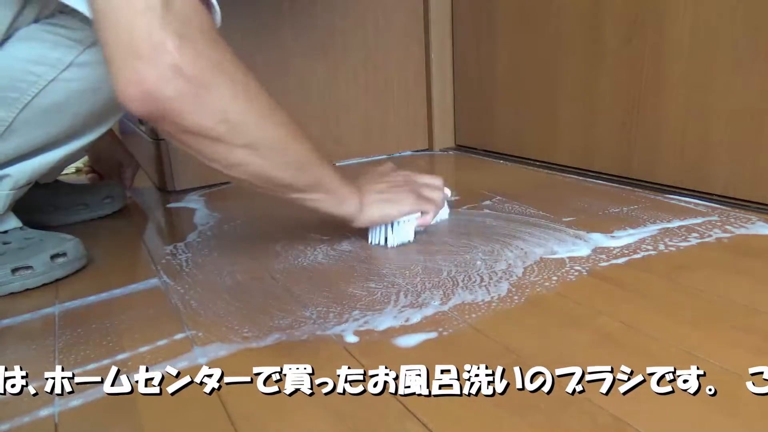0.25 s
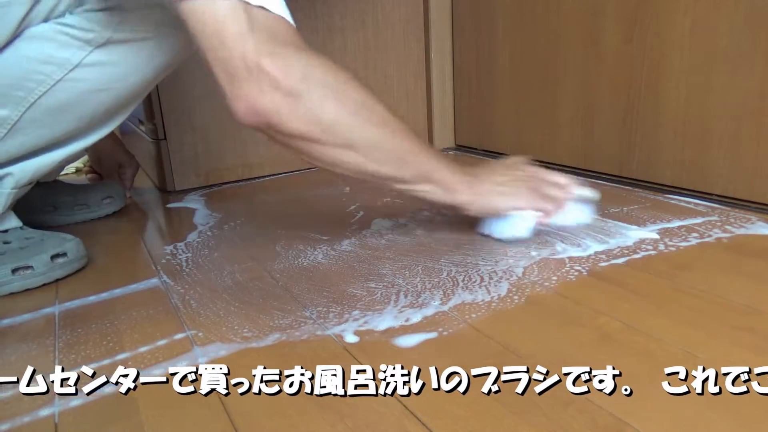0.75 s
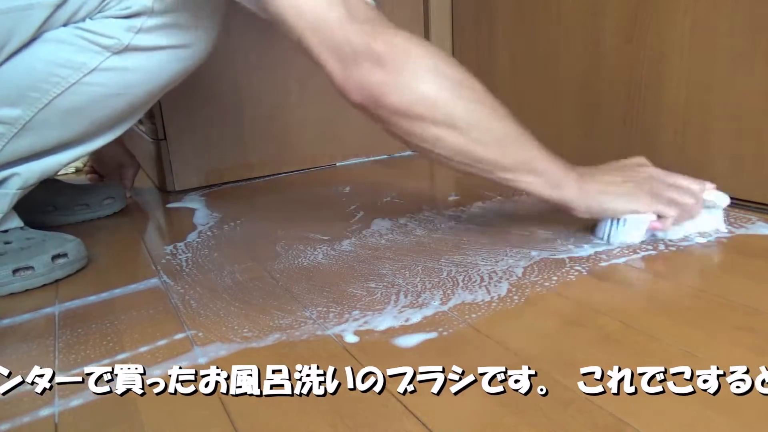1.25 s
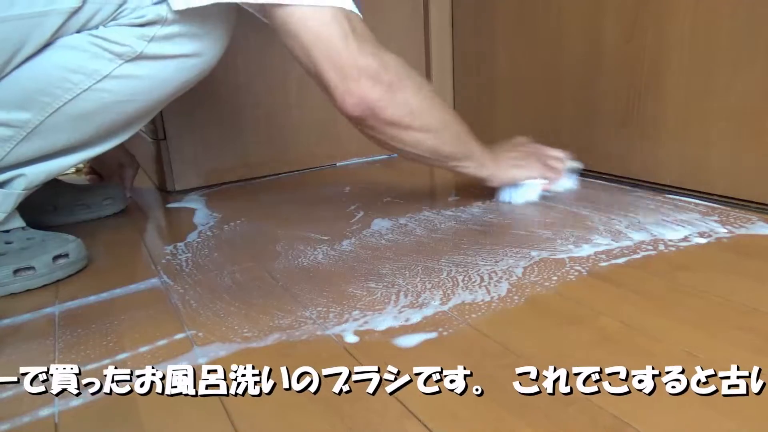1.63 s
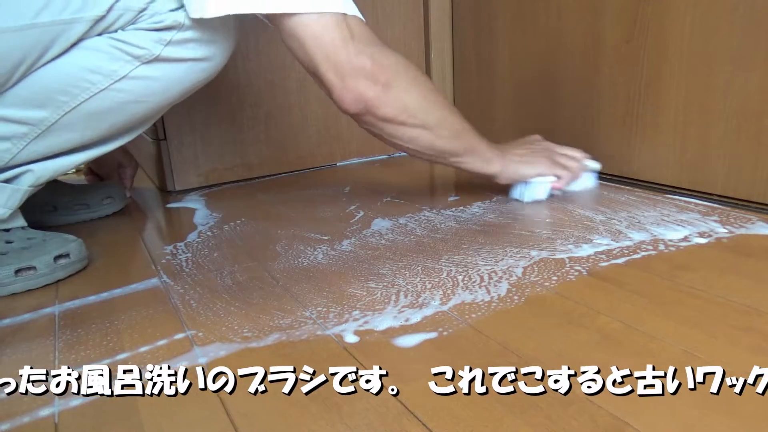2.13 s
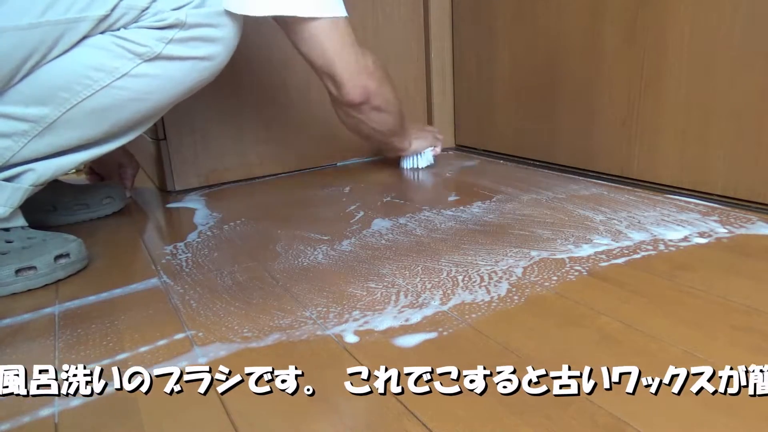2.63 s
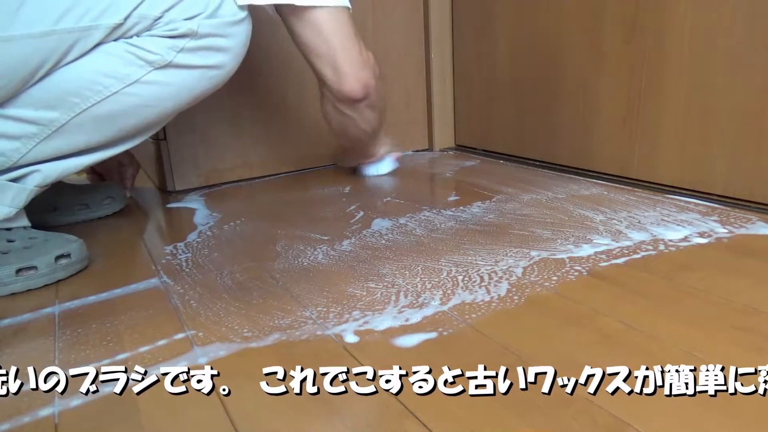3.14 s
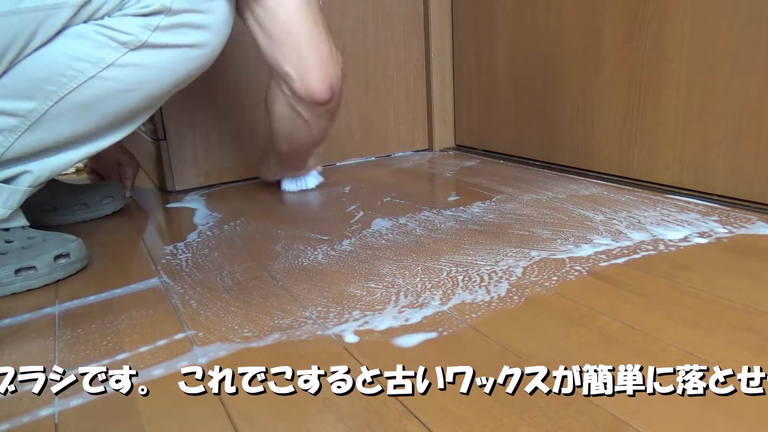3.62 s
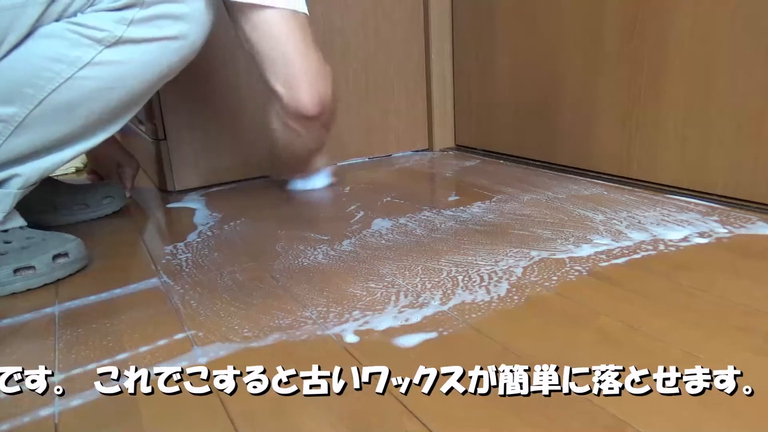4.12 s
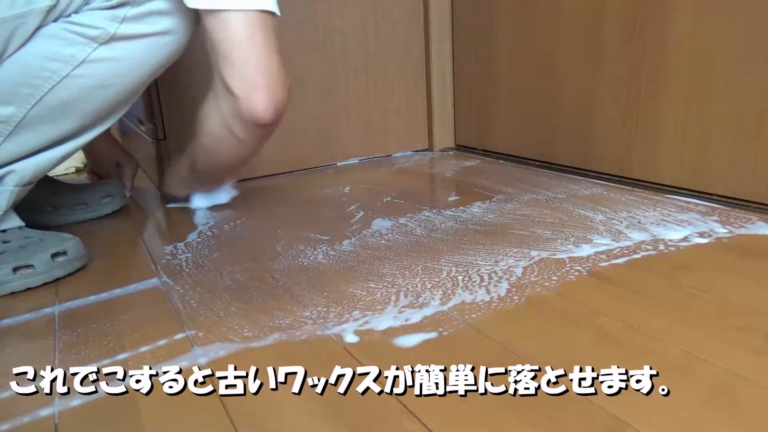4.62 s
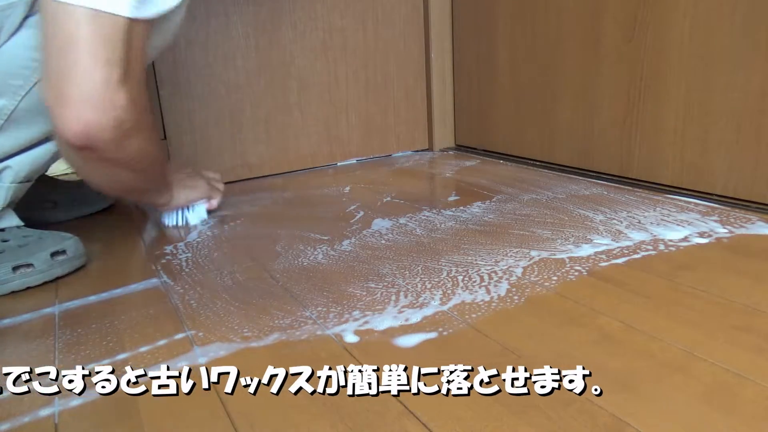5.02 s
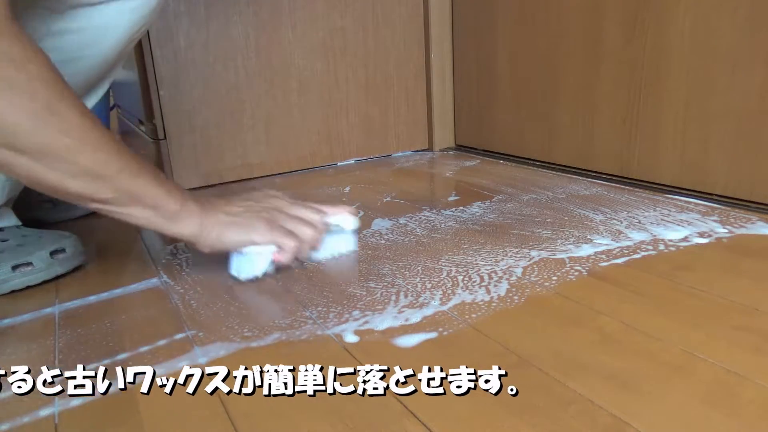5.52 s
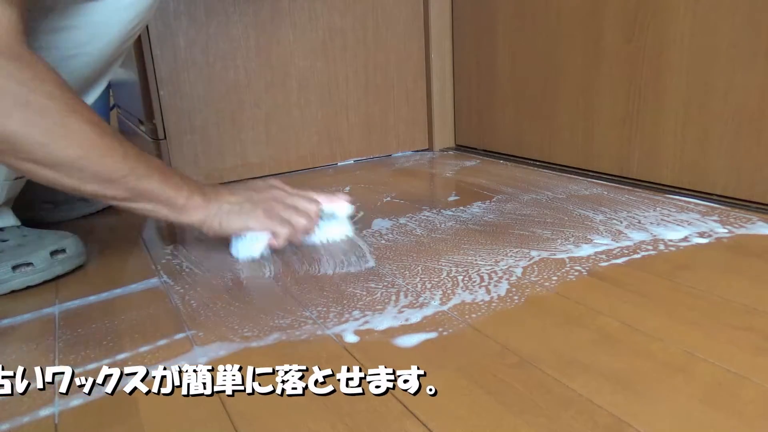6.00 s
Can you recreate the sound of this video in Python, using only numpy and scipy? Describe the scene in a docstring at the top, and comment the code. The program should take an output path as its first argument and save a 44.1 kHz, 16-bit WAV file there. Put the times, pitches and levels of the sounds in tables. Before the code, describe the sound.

From the start a stiff bristle brush scrubs quickly over a soapy wooden floor, around seven strokes a second, each a scratchy swish that swells and dips with the hand. Foam sizzles brightly above, tufts stutter at many turns, and a soft low rumble comes in uneven lumps below. A light tap lands near 1.2 s. From about 2 s the strokes slow to five or six a second and become less even, with weak knocks at 1.9, 2.1 and 2.6. Loud hollow door thumps with hard plastic cracks follow near 2.9, 3.1, a cluster at 3.3-3.5, then 3.9, 4.3 and 4.6, with brief woody rubs along the door from 3 to 4.4. The foam thins around 3 s. After a faint tap at 5.3, strong, steady scrubbing continues to the end at about 6.3 s. Close, almost centred, in a quiet hallway with short reflections.

```python
"""A stiff bristle brush scrubs to and fro over a soapy wooden floor in a hallway, about seven strokes a second
at first and slower later. Bristle flicks and sizzling foam follow the speed of the hand, the tufts judder by
stick-slip, mostly soon after each turn, and a low floor rumble comes in lumps. From the second second on the
brush knocks a wooden door, ringing its modes, and midway rubs along its foot. The microphone is close; echoes
from the corner and a short diffuse tail surround the sound."""
import sys
import numpy as np
from scipy import signal
from scipy.fft import rfft, irfft, next_fast_len
from scipy.io import wavfile

SR = 44100
rng = np.random.default_rng(int(sys.argv[2]) if len(sys.argv) > 2 else 0)


def dump(signal):
    """Clip the signal to [-1, 1] and save it as 16-bit WAV at the path in sys.argv[1]."""
    limited = np.clip(np.atleast_2d(signal).T, -1, 1)
    pcm = np.round(limited * 32767).astype(np.int16)
    wavfile.write(sys.argv[1], SR, pcm)


N = 276066
TIME = np.arange(N) / SR


def from_db(db):
    """Decibels to amplitude gain: 20 dB is a factor of ten."""
    return 10 ** (np.asarray(db) / 20)


def rms_one(x):
    """Normalise the mean power, so that the rms is one."""
    return x / np.sqrt(np.mean(x ** 2) + 1e-20)


def over_time(rows):
    """Linear interpolation of (time_s, level_db) rows."""
    return np.interp(TIME, *np.transpose(rows))


def colour(x, spectrum):
    """Zero-phase filtering by a (frequency_hz, level_db) spectrum, interpolated over log frequency."""
    hz, db = np.transpose(spectrum)
    size = next_fast_len(N)
    bins_hz = np.maximum(np.arange(size // 2 + 1) * SR / size, 1)
    gain = from_db(np.interp(np.log(bins_hz), np.log(hz), db))
    return irfft(rfft(x, size) * gain, size)[:N]


def drift(rate):
    """Slow random modulation of rms one: Gaussian points, `rate` a second, joined by straight lines."""
    knots = rng.standard_normal(8000)
    return rms_one(np.interp(TIME * rate, np.arange(len(knots)), knots))


def flicks(per_s, spread_db):
    """Random impulse noise of uneven size and sign; the mean power is one whatever the rate."""
    chance = per_s / SR
    sizes = from_db(spread_db * np.minimum(rng.exponential(1, N), 4))
    signs = rng.choice([-1, 1], N)
    return rms_one((rng.random(N) < chance) * sizes * signs / np.sqrt(chance))


def slips(per_s, jitter, burst_s):
    """Irregular stick-slip: each release of a tuft is a burst of noise that decays exponentially."""
    rate = per_s * np.exp(jitter * drift(150))
    releases = np.diff(np.floor(np.cumsum(rate) / SR), prepend=0)
    releases = releases * from_db(rng.uniform(-0.5, 1.8, N))
    bursts = signal.lfilter([1], [1, -np.exp(-1 / (burst_s * SR))], releases + 1e-18)
    return bursts * rng.standard_normal(N)


def swells(rows, scale_s, rise=0.75, fall=1.07):
    """Power sum of Gaussian envelopes, one per (centre_s, level_db) row, building faster than they fade."""
    power = 0
    for s, db in rows:
        width = scale_s * np.where(TIME < s, rise, fall)
        power = power + from_db(2 * db) * np.exp(-((TIME - s) / width) ** 2)
    return np.sqrt(power)


def dying(t, t60):
    """Exponential decay of a free vibration, down 60 dB after t60 seconds."""
    return np.exp(-np.log(1000) * t / t60)


# quiet air of the hallway, relative spectrum: frequency_hz [Hz], level_db [dB]
AIR_SPECTRUM = [(20, -13), (60, -20), (150, -3), (500, 15), (3000, -21), (15000, -36)]


def room_air():
    """Diffuse background noise: independent middle and side signals give unlike left and right."""
    middle, side = (rms_one(colour(rng.standard_normal(N), AIR_SPECTRUM)) for _ in range(2))
    return from_db(-60) * (middle + 1.2 * side * np.array([[1], [-1]]))


# strokes, push and pull in turn: start_s [s], full_speed_level_db [dB],
# full_speed_place [share of the stroke, 0-1], flip_judder_db [dB]
STROKES = [(-.08, -23, 0.44, -41), (0.083, -22, 0.56, -21.5), (.218, -23, 0.42, -21.5),
           (.357, -23.5, .55, -21), (.501, -25, 0.41, -26), (0.649, -24.5, 0.52, -22),
           (0.791, -25.5, 0.43, -27), (0.934, -23.5, 0.52, -20), (1.071, -23, .51, -29),
           (1.214, -23, 0.47, -24), (1.344, -24, .53, -42), (1.487, -25.5, 0.49, -24),
           (1.609, -23.5, 0.49, -38), (1.781, -25, 0.43, -44), (1.928, -24, 0.44, -28.5),
           (2.13, -28, 0.51, -31), (2.29, -23, 0.69, -49), (2.492, -30, 0.2, -24.5),
           (2.583, -26.5, 0.42, -32), (2.708, -31, 0.28, -27), (2.845, -28, 0.43, -21.5),
           (2.985, -28.5, .45, -29), (3.09, -23.5, 0.54, -40), (3.327, -25, 0.34, -22),
           (3.521, -23, 0.35, -22.5), (3.704, -25, .66, -20), (3.884, -24, 0.55, -26),
           (4.115, -26, 0.53, -19), (4.261, -27, 0.52, -40), (4.463, -28, 0.51, -30),
           (4.594, -29.5, 0.6, -19), (4.752, -28.5, 0.62, -47), (4.953, -25.5, .6, -24.5),
           (5.095, -24, 0.6, -39), (5.297, -23.5, 0.62, -21.5), (5.468, -24, 0.64, -24),
           (5.649, -22.5, 0.73, -28), (5.833, -23, 0.69, -29), (6.015, -22, 0.63, -20.5),
           (6.183, -22, 0.67, -37)]
LAST_TURN_S = 6.34


def hand():
    """Reciprocating motion, at rest at each turn: speed 0-1, force in dB, direction (1 push, -1 pull)."""
    start, force_db, place, _ = np.transpose(STROKES)
    length = np.diff(start, append=LAST_TURN_S)
    k = np.maximum(np.searchsorted(start, TIME) - 1, 0)
    phase = np.clip((TIME - start[k]) / length[k], 0, 1)
    speeding_up = phase / place[k]
    slowing_down = (1 - phase) / (1 - place[k])
    speed = np.sin(np.pi / 2 * np.minimum(speeding_up, slowing_down))
    fastest_s = start + place * length
    push = np.interp(TIME, fastest_s, (-1) ** np.arange(len(start)))   # glides between full speeds
    return speed, force_db[k], push


# bristles still creeping while the hand turns; quick strokes hardly stop: time_s [s], level_db [dB]
CREEP = [(0, -34), (.5, -31.5), (1.3, -39.5), (1.8, -46.5), (2.55, -45), (2.7, -34), (2.85, -43),
         (4.5, -41.5), (5.1, -32.5), (5.3, -37.5), (5.9, -30), (6.26, -33)]


def friction_db(speed, force_db, law=1.074, law_per_db=-0.1):
    """Power-law friction in speed, sooner to bite in a harder stroke; at the turns only creep is left."""
    sliding = speed ** (law + law_per_db * (force_db - force_db.mean()))
    creep = from_db(over_time(CREEP))
    return 20 * np.log10(sliding * from_db(force_db) + (1 - sliding) * creep)


# relative spectra of bristle tips on the grain, bursting foam, fine fizz of fresh foam and
# droning boards: frequency_hz [Hz], level_db [dB per Hz]
SCRATCH_SPECTRUM = [(300, -64), (600, -36), (1100, -5), (1900, 1.5), (2600, 1.5), (3400, 1), (4800, 0),
                    (6200, -5), (8000, -4), (10500, -24), (15000, -51)]
SIZZLE_SPECTRUM = [(3000, -37), (5500, -6), (6600, -5), (7400, -1.5), (8500, 1.5), (9100, -3),
                   (9800, -10.5), (10800, -14.5), (12600, -15), (15500, -54)]
FIZZ_SPECTRUM = [(7000, -39), (9500, -1), (10700, -3), (12400, 1.5), (13800, 0), (14700, -16), (15500, -15)]
BOARD_SPECTRUM = [(250, -63), (480, -11), (700, -4.5), (860, -1), (1150, 2), (1500, 0), (2100, -3.5),
                  (3500, -31)]
# lather under the brush, thin along the door, as changes of the foam level: time_s [s], change_db [dB]
LATHER = [(0, 1), (.8, 4.5), (1.15, 3.5), (2.25, 5), (2.55, -3.5), (3.05, -6.5), (3.4, 1), (3.85, 3.5),
          (4.2, 0.5), (4.65, 0.5), (4.9, -2.5), (6.26, 0)]
# fizz against the lather, weak where the floor is only damp: time_s [s], change_db [dB]
FRESH_FOAM = [(0, -4.5), (.7, -6.5), (1.6, -12.5), (2.4, -6), (2.95, -23), (3.2, -9), (3.9, -12),
              (4.2, -6.5), (5.1, -8.5), (5.7, -4), (6.26, -4.5)]


def brush(speed, force_db, push):
    """Impact noise of bristles and bubbles, denser with speed; slow strokes are duller and drive the boards."""
    level_db = friction_db(speed, force_db) + 0.79 * drift(130)   # tufts let go in clumps
    slowness = 1 - speed
    # a push digs the bristles into the boards, a pull lets them glide on the foam
    foam_db = over_time(LATHER) - 0.3 * push - 5 * slowness
    fizz_db = foam_db + over_time(FRESH_FOAM) - 0.8 * push - 3 * slowness + 0.65 * drift(35)
    board_db = -4.0 - 3 + 3 * push + 9.5 * slowness

    scratch = rms_one(colour(flicks(2500 + 9000 * speed, spread_db=1.5), SCRATCH_SPECTRUM))
    foam = rms_one(colour(flicks(4000 + 14000 * speed, spread_db=1.5), SIZZLE_SPECTRUM))
    fizz = rms_one(colour(flicks(3000 + 12000 * speed, spread_db=-2.5), FIZZ_SPECTRUM))
    boards = rms_one(colour(flicks(1500 + 3000 * speed, spread_db=-0.5), BOARD_SPECTRUM))

    mix = scratch * from_db(2.13 + 0.5 * drift(60))
    mix = mix + foam * from_db(0.35 + foam_db)
    mix = mix + fizz * from_db(-1.5 + fizz_db)
    mix = mix + boards * from_db(board_db)
    return from_db(level_db) * mix


# relative spectrum of boards and brush body shaken by the tufts: frequency_hz [Hz], level_db [dB per Hz]
JUDDER_SPECTRUM = [(300, -22), (550, -7.5), (800, -0.5), (950, 2.5), (1160, 5.5), (1400, 1), (1800, -2),
                   (2600, -4), (5000, -43)]
# tufts snag and judder on the boards: centre_s [s], level_db [dB]
SNAGS = [(.015, -20.5), (.09, -20), (0.324, -17.5), (.61, -26), (0.904, -21), (1.447, -22.5), (2.037, -29),
         (2.66, -25), (2.76, -25), (3.667, -19.5), (4.06, -25), (5.03, -29)]


def judder():
    """Stick-slip vibration: tufts slip in quick volleys as they flip after each turn, or when they snag."""
    start, _, _, flip_db = np.transpose(STROKES)
    flip_s = start + 0.18 * np.diff(start, append=LAST_TURN_S)   # share of the stroke gone at the flip
    flips = swells(zip(flip_s, flip_db), scale_s=0.013)
    snags = swells(SNAGS, scale_s=0.019)
    volleys = rms_one(colour(slips(per_s=300, jitter=0.41, burst_s=0.0069), JUDDER_SPECTRUM))
    return np.hypot(flips, snags) * volleys


# relative spectrum of the low floor rumble: frequency_hz [Hz], level_db [dB per Hz]
RUMBLE_SPECTRUM = [(25, -34), (55, -14.5), (85, -8.5), (102, -9.5), (126, 1.5), (175, 1), (220, 1),
                   (310, -9), (400, -4), (700, -5.5), (1500, -51)]


def floor_rumble(speed, force_db, alternation):
    """Amplitude modulation: low rumble in random lumps, dropping out in fast strokes, most on every second."""
    lumps = 2 * np.tanh(drift(28) / 2)   # limits how hard a lump can be
    dropout_db = np.interp(alternation, [-1, 1], [-11.5, -2.5]) * speed ** 2
    follow_db = 0.6 * (force_db - force_db.mean())   # share of the stroke's level that it follows
    level_db = -41.5 + follow_db + dropout_db + 3.5 * lumps
    return from_db(level_db) * rms_one(colour(flicks(1500, spread_db=2.5), RUMBLE_SPECTRUM))


def struck(modes, t, favoured_hz, favour_db=5, uneven_db=1.9):
    """Modal excitation: modes with a belly near the struck spot ring strongest, with a random spread."""
    out = 0
    for k, (hz, db, t60) in enumerate(modes):
        belly = np.exp(-(2 * np.log2(hz / favoured_hz)) ** 2)
        db = db + favour_db * belly + uneven_db * rng.standard_normal()
        out = out + (-1) ** k * from_db(db) * np.sin(2 * np.pi * hz * t) * dying(t, t60)
    return out


# back of the brush taps or hits the door: start_s [s], thud_db [dB], crack_db [dB],
# favoured_hz (pitch favoured at that spot) [Hz]
KNOCKS = [(1.2304, -31, -7, 900), (1.945, -31, -16, 700), (2.149, -21.5, -18, 293),
          (2.608, -25.5, -17, 350), (2.9102, -3.5, -1, 298), (3.1266, -5.5, 1, 210),
          (3.3457, -4.5, -24, 187), (3.408, -8, -18, 342), (3.49, -9.5, -7.5, 220), (3.728, -24, -9, 700),
          (3.9188, 1, -4, 290), (4.134, -23, -10, 700), (4.2864, 0, -2.5, 500), (4.3153, -1.5, -13, 490),
          (4.489, -27, -11.5, 800), (4.62, -16, -7, 900), (4.6391, -2, -6, 395), (5.328, -21, -10, 900)]
# modes of the door panel, then of the brush body: pitch_hz [Hz], level_db [dB], t60_s [s]
DOOR_MODES = [(185.6, -21, 0.23), (240, -19, 0.17), (280, -24.5, 0.24), (346.4, -18.5, 0.11),
              (395, -23, 0.27), (478, -23.5, 0.13), (521, -23, 0.16), (682, -19.5, 0.048),
              (810, -22, 0.087), (1122, -21.5, 0.26), (1620, -28, .06), (2230, -30, 0.044)]
BRUSH_MODES = [(352, -9.5, 0.078), (573, -9.5, 0.021), (1140, -16, 0.029), (1740, -17.5, 0.02),
               (2340, -12, 0.021), (3160, -19, 0.0099)]
# dense upper modes of the door and its frame, as octave bands: centre_hz [Hz], level_db [dB], t60_s [s]
DOOR_TAIL = [(191, -25.5, 0.24), (385, -21.5, 0.24), (770, -22.5, 0.23), (1290, -20.5, 0.11),
             (2720, -37, 0.065)]


def door_knocks():
    """Impact response: a hard plastic crack, a splash of the bristles and a modal ring of panel and brush."""
    t = np.arange(SR // 2) / SR
    out = np.zeros(N + len(t))
    bristles = signal.butter(2, [900, 4000], "band", fs=SR, output="sos")
    for s, thud_db, crack_db, favoured_hz in KNOCKS:
        ring = struck(DOOR_MODES, t, favoured_hz) + struck(BRUSH_MODES, t, favoured_hz, favour_db=6)
        for hz, db, t60 in DOOR_TAIL:
            octave = signal.butter(2, [hz / np.sqrt(2), hz * np.sqrt(2)], "band", fs=SR, output="sos")
            noise = rms_one(signal.sosfilt(octave, rng.standard_normal(len(t))))
            ring += from_db(db) * noise * dying(t, t60)
        splash = rms_one(signal.sosfilt(bristles, rng.standard_normal(len(t)))) * dying(t, 0.041)
        crack = np.sin(2 * np.pi * 1500 * t) * dying(t, 0.0045)
        at = int(s * SR)
        out[at:at + len(t)] += from_db(thud_db) * ring + from_db(crack_db) * (crack + from_db(-14) * splash)
    return out[:N]


# brush drags along the door: centre_s [s], level_db [dB]
DOOR_RUBS = [(3.02, -30), (3.18, -28.5), (3.24, -18), (3.39, -27), (3.575, -21), (3.63, -23.5),
             (3.73, -32.5), (3.975, -22), (4.375, -32)]
# relative spectrum of the rubbed door: frequency_hz [Hz], level_db [dB per Hz]
RUB_SPECTRUM = [(110, -36), (190, -3.5), (370, 3.5), (520, 1.5), (750, 7), (1150, -3.5), (2000, -48)]


def door_rubs():
    """Stick-slip friction along the door, in brief swells."""
    rubbing = rms_one(colour(slips(per_s=220, jitter=0.4, burst_s=0.0068), RUB_SPECTRUM))
    return swells(DOOR_RUBS, scale_s=0.026) * rubbing


def door():
    """Radiation cutoff: the thin panel radiates little below its lowest mode."""
    cutoff = signal.butter(4, 145, "high", fs=SR, output="sos")
    return signal.sosfilt(cutoff, door_knocks() + door_rubs())


def corner(x, echo_db=-14):
    """Early reflections from the door and wall close behind, their delays drifting as the hand travels."""
    out = x
    for delay_s in (0.0023, 0.0051):
        moving_s = delay_s * (1 + 0.0994 * drift(3))
        out = out + from_db(echo_db) * np.interp(TIME - moving_s, TIME, x, left=0)
    return out / np.sqrt(1 + 2 * from_db(2 * echo_db))


def hallway(x, t60=0.19):
    """Diffuse reverberation: a random blend of two noise tails varies the reflections as the hand travels."""
    t = np.arange(SR // 2) / SR
    tails = rng.standard_normal((2, len(t))) * dying(t, t60) * (t > 0.004)
    first, second = (signal.fftconvolve(x, tail / np.sqrt(np.sum(tail ** 2)))[:N] for tail in tails)
    place = 2.49 * drift(6)   # blend angle in radians
    return np.cos(place) * first + np.sin(place) * second


# gain of the left-right difference: frequency_hz [Hz], level_db [dB]
WIDTH = [(60, -17), (150, -12.5), (300, -20), (600, -15.5), (4000, -18), (8000, -16), (12000, -9)]


def side_reflections(near):
    """Stereo decorrelation: reflections from the sides reach the two microphones with opposite sign."""
    return colour(hallway(near), WIDTH) * np.array([[1], [-1]])


def scene():
    """Superposition of brush, floor and door, nearly straight ahead, in a quiet hallway."""
    air = room_air()
    speed, force_db, push = hand()
    scrubbing = corner(brush(speed, force_db, push) + judder())
    near = scrubbing + floor_rumble(speed, force_db, alternation=push) + door()
    stereo = near + from_db(-12.5) * hallway(near) + side_reflections(near)
    return stereo * from_db([[-0.25], [0.25]]) + air   # a shade louder on the right


def record(dry):
    """Soft saturation rounds off the loudest knocks at full scale; a low-pass cuts the top."""
    rounded = dry / (1 + dry ** 4) ** (1 / 4)
    stop_hz = 15400 + 600   # down 70 dB from here up
    return signal.sosfilt(signal.cheby2(16, 70, stop_hz, fs=SR, output="sos"), rounded)


dry = scene()
out = record(dry)
dump(out)
```